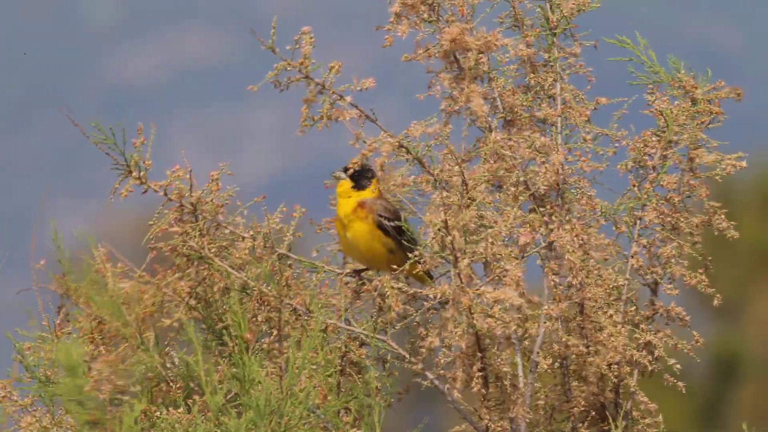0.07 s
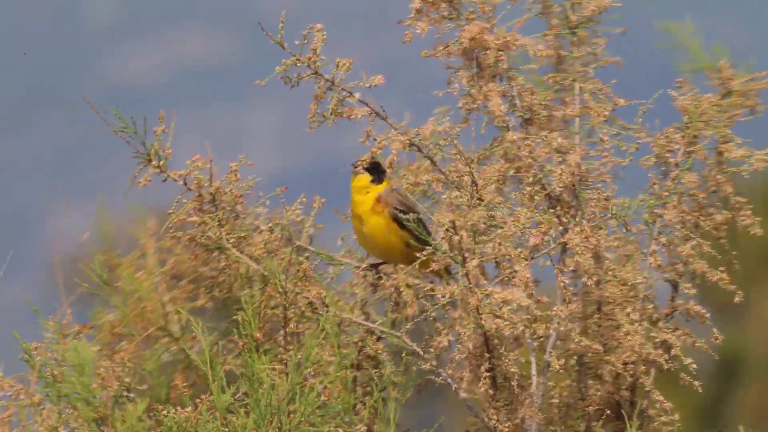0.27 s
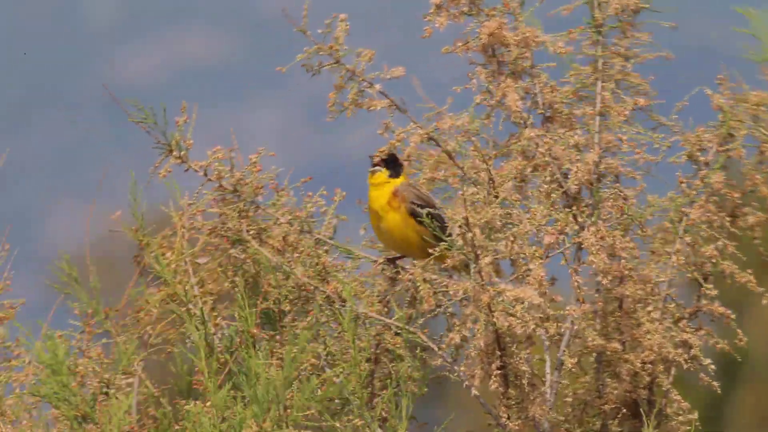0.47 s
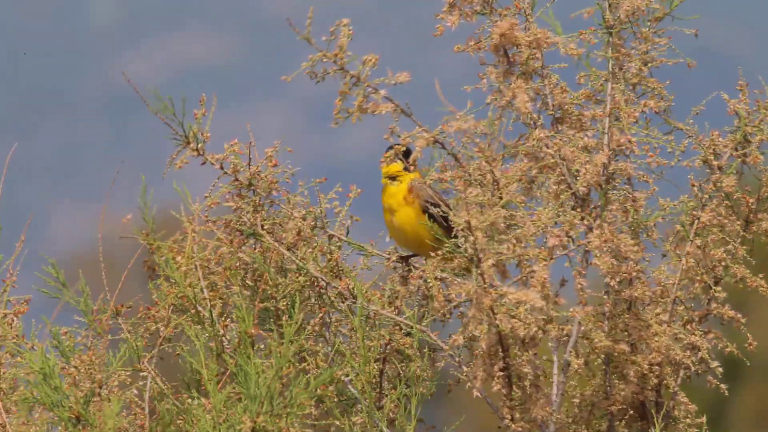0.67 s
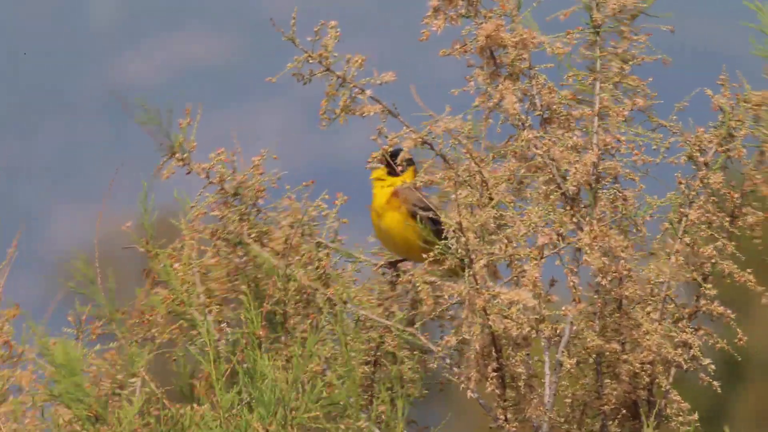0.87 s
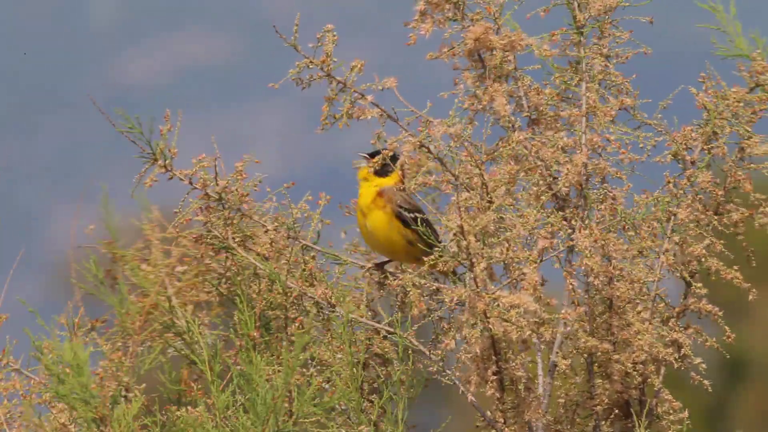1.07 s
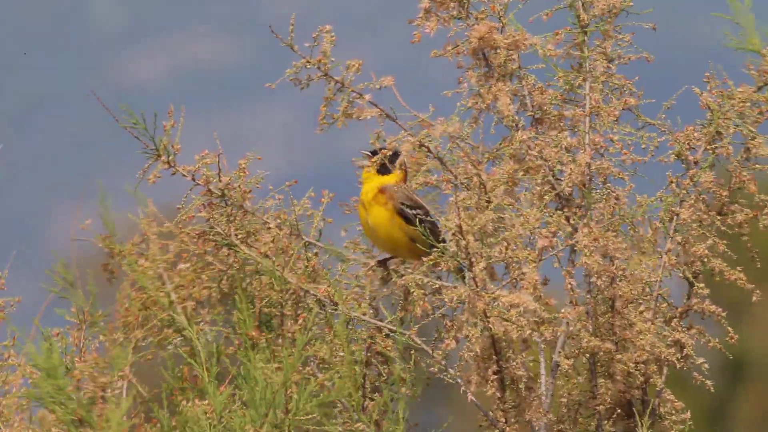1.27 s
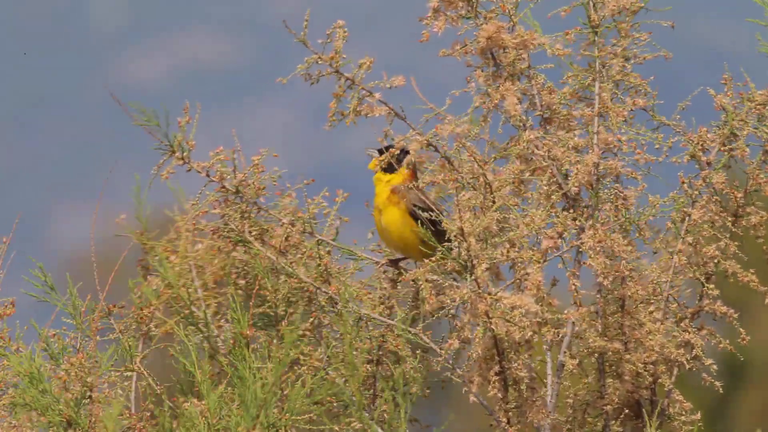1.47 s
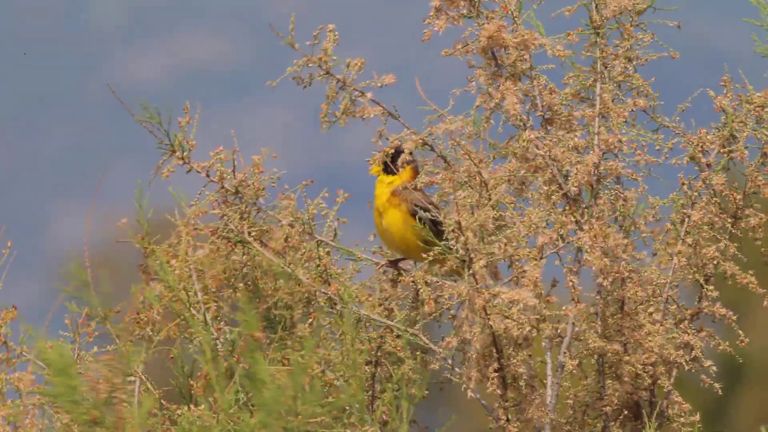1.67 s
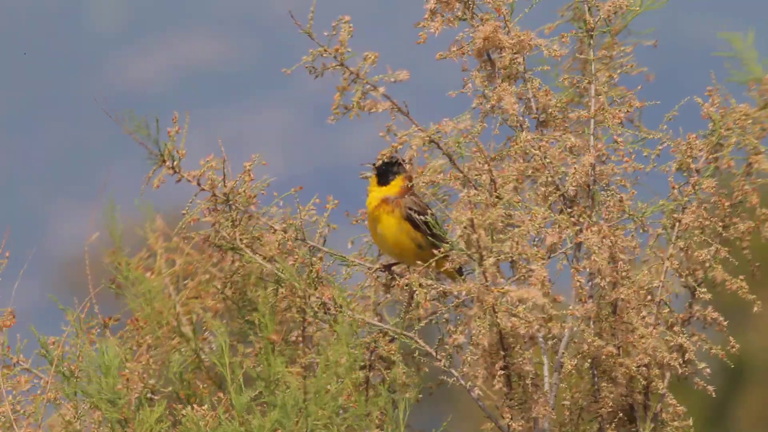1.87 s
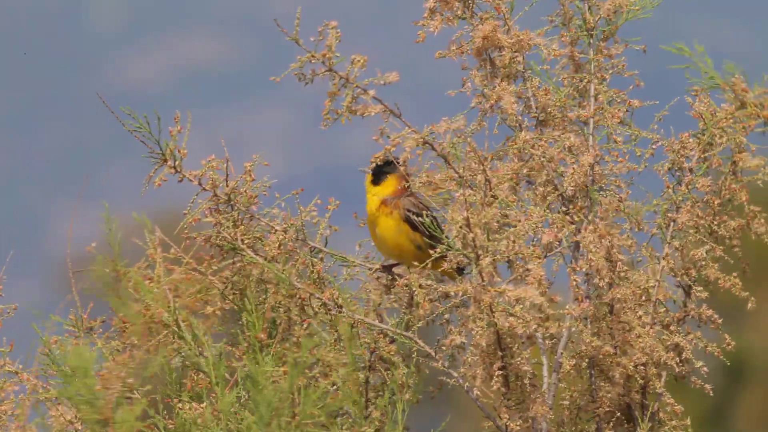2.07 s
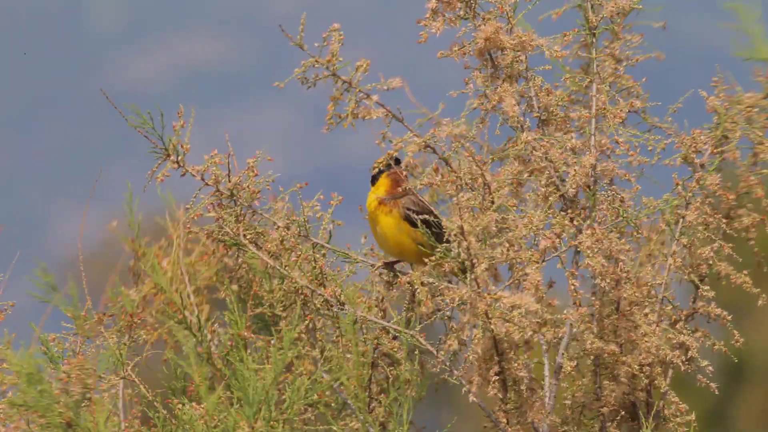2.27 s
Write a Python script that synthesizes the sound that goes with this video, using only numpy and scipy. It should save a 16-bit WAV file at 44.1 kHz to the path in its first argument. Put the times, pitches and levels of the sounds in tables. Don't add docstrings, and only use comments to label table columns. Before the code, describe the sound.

Songbird song from a bush: two short buzz-whistles, then quick chattering high notes, over faint breeze

```python
import sys
import numpy as np
from scipy import signal
from scipy.fft import rfft, irfft
from scipy.io import wavfile
from scipy.ndimage import uniform_filter1d

SR = 44100
rng = np.random.default_rng(int(sys.argv[2]) if len(sys.argv) > 2 else 0)


def volts(x):
    e = np.asarray(x, float) / 20
    return 10 ** e


def inscribe(sig):
    pcm = np.round(np.clip(np.atleast_2d(sig).T, -1, 1) * 32767)
    wavfile.write(sys.argv[1], SR, pcm.astype(np.int16))


N = 103635

# (frequency [Hz], spectrum level [dB])
AIR_SPECTRUM = [(25, -9), (190, -2), (330, -15), (1300, -19), (3500, -13), (15600, -33)]
# (time [s], pitch [Hz], level [dB])
WIND_THUMPS = [(.036, 105, -35), (.080, 150, -39), (.171, 160, -28), (.905, 55, -42), (1.345, 55, -40),
               (1.13, 80, -40), (1.42, 85, -34), (.26, 70, -46), (.285, 140, -46), (.325, 110, -46),
               (.59, 70, -48), (.675, 90, -47), (1.10, 170, -44), (1.25, 60, -46), (1.425, 200, -42),
               (1.46, 50, -43), (1.50, 100, -47), (1.63, 80, -48)]
# (time [s], level [dB])
RUSTLE_LEVEL = [(0, -56), (.08, -57), (.2, -51), (.3, -66), (.75, -72), (.8, -59), (1.0, -61), (1.1, -68),
                (2.05, -69), (2.15, -60), (2.35, -64)]
# (centre [Hz], width [Hz], level [dB])
STALK_MODES = [(300, 140, -9), (850, 300, -17), (1700, 600, -6), (3000, 500, -5), (4100, 900, -7)]
# (time [s], centre [Hz], level [dB], decay [s])
TWIG_SNAP = [
    (1.336, 700, -40, .002),
    (1.342, 8000, -42, .006),
    (1.348, 2200, -46, .005),
]

SWEEP = .0098, [2680, 2880, 3400, 4250, 6000, 4700, 3500, 2950, 2700], [-14, -10, -5, -1, -16, 2, -6, -11,
         -15]
WHISTLE = .043, [2850, 3330, 3470, 3500, 3500, 3490, 3480, 3460, 3440], [-14, -6, -2, 0, -2, -4, -3, -6,
           -22]
PULSE = .0122, [3080, 2960, 2920, 2920, 2900, 2780], [-9, 0, 0, -1, -1, -2, -10]
LEAD_IN = .018, [2900, 2900, 2900, 2800], [-24, -14, -5, 0, -3]
HIGH_LEAD = .029, [4050, 4150, 4200, 4250, 4280, 4250, 3500], [-20, -15, -14, -12, -4, -2, 0, -4, -2]
DIP_PULSE = .0134, [4100, 3500, 3100, 3250, 3380, 3300, 3180, 3020], [-14, -2, -7, 0, -1, 0, -4, -12]
CHUCK = .030, [2550, 2340, 2310, 2320, 2320], [0, -4, -4, -5, -15, -10, -12, -18]
SLIDE = .012, [4300, 4000, 3750, 3500, 3430, 3200], [-16, -10, -4, -2, -3, 0, -8]
FLICK = .0052, [4300, 3750, 3450, 3180, 3000], [-11, -2, 0, -6, -11]
CLOSE = .0135, [3400, 4100, 4050, 4150, 4300, 4300, 4050], [-12, -3, -6, -4, -9, -2, -1, 0, -6]
TICK = .0034, [5100, 4750, 4450, 4000, 3500], [-14, -1, 0, -8, -11, -16]
ARCH = .103, [2050, 2080, 2100, 2170, 2330, 2720, 2740, 2640, 2150], [-30, -23, -18, -15, -10, 0, -4, -5,
        -20]
LOW = .017, [2000, 1840, 1820], [1, 0, -8]
RISE = .034, [2650, 2720, 2900, 3120], [-22, -12, -6, 0, -8]
TRILL_DOWN = .0066, [3300, 3050, 2820, 2680, 2580], [-12, -3, -1, 0, -13]
TRILL_UP = .0048, [2480, 2700, 3000, 3250], [-15, -11, -7, 0, -8]
TRILL_HOLD = .0135, [2950, 3020, 3050, 3100, 3100], [-4, 0, -2, -3, -3, -6, -13]
FALL = .034, [2450, 2700, 2480, 2400, 2330, 2220, 2100], [-16, 0, -5, -9, -10, -14, -12, -16, -22]
HOOK = .009, [4400, 5100, 5500, 5350, 4950, 4900, 4900], [-10, 0, -16, -1, -1, -4, -14]
HOOK_END = .010, [5400, 5400, 5000], [-8, 0, -3, -2]
UP = .032, [2900, 3050, 3150, 3250, 3550, 3750, 3850, 4100], [-14, -11, -9, -8, 0, -1, -2, -1, -10]
DOWN = .014, [4700, 3650, 3350, 3280, 3180, 2950], [-14, 0, -3, 0, 0, -4, -14]
UP_LOW = .028, [2300, 2500, 2680, 2870, 3050, 3250, 3650], [-18, -12, -10, -4, 0, -2, -1, 0, -14]
DOWN_LOW = .023, [3900, 3050, 2880, 2800, 2700, 2500, 2200, 2400], [-12, 0, -4, -3, -6, -16, -20, -24]
FAR_WHISTLE = .175, [1550, 1870, 1730, 1600, 1640, 1690, 1715, 1550], [-8, -4, -7, -3, 0, -12]
FAR_RISE = .12, [3650, 4030, 4150, 4400, 4600], [-4, 0, -10]
FAR_LOW = .085, [1000, 1050, 1120, 1200], [-6, 0, -2, -6]
FAR_CHIP = .016, [1400, 1750, 1800], [-6, 0, -3]
FAR_PEEP = .02, [5600, 5750], [0, -4]

# (gesture, time [s], level [dB], pitch factor [1] if given)
FAR_CALLS = [(FAR_WHISTLE, 1.108, -47), (FAR_WHISTLE, 2.12, -52), (FAR_RISE, 2.24, -51),
             (FAR_RISE, 1.50, -55), (FAR_LOW, 2.07, -59), (FAR_PEEP, .912, -50),
             (FAR_PEEP, 1.43, -53, 1.04), (FAR_CHIP, 2.108, -50), (FAR_CHIP, 1.580, -53)]
# (time [s], level [dB])
FAR_CHURRS = [(.80, -52), (1.17, -52), (1.56, -50), (1.72, -52), (1.855, -50), (2.09, -50), (2.225, -50),
              (2.315, -50)]
OVERTONES = -36, -42
# (gesture, time [s], level [dB], pitch factor [1] and overtones [dB] if given)
SINGLE_NOTES = [(WHISTLE, .267, -17.5, 1., (-33, -38)), (WHISTLE, .540, -17, 1., (-33, -38)),
                (TICK, .8848, -34, 1.1), (LEAD_IN, .669, -25), (HIGH_LEAD, .854, -22, 1., (-28, -36)),
                (CHUCK, 1.035, -30), (CHUCK, 1.0745, -30), (FLICK, 1.0985, -33, 1.05), (SLIDE, 1.1015, -20),
                (LOW, 1.165, -39, 1.25), (CHUCK, 1.1735, -29, .97), (CHUCK, 1.213, -29, .96),
                (FLICK, 1.237, -30), (SLIDE, 1.2405, -19), (CLOSE, 1.4065, -18, 1., (-24, -28)),
                (LOW, 1.533, -38), (LOW, 1.592, -39), (FALL, 1.822, -21), (HOOK_END, 1.978, -22),
                (DOWN, 2.032, -24), (TRILL_DOWN, 2.046, -25, 1.08), (UP_LOW, 2.054, -25),
                (DOWN_LOW, 2.0825, -24)]
# (gesture, overtones [dB], (time [s], level [dB], flutter [Hz], flutter length [s], depth [0-1]))
FLUTTERED_SLURS = [
    (ARCH, (-43, -52, -48), (1.429, -20.5, 250, .054, .25)),
    (RISE, (-46, -50), (1.638, -19, 270, .020, .8)),
    (UP, (-46, -50), (2.000, -25, 270, .020, .9)),
]
# (gesture, overtones [dB], first time [s], period [s], level of each repeat [dB])
TRAINS = [(SWEEP, (-23, -31), .1852, .0117, [-36, -29, -24, -21, -19, -19, -19]), (SWEEP, (-23, -31),
          .4535, .0122, [-35, -30, -26, -22, -20, -20, -20]), (PULSE, (-45, -48),
          .6885, .0134, [-21, -21, -19, -19, -19, -24]), (DIP_PULSE, (-43, -35),
          .8850, .0143, [-25, -21, -20, -19, -19, -18]), (FLICK, (-37, -36),
          1.115, .0062, [-18, -19, -20, -19, -23, -26]), (FLICK, (-37, -36),
          1.2535, .0062, [-20, -17, -18, -18, -20, -25]), (TICK, (-20, -32),
          1.3436, .0063, [-24, -23, -23, -23, -22, -21, -21, -18, -18, -21]), (HOOK, (-36, -40),
          1.919, .0115, [-42, -33, -28, -25, -22]), (TRILL_DOWN, (-39, -50),
          1.6752, .0278, [-20, -21, -23, -19, -21, -23]), (TRILL_UP, (-40, -48),
          1.6828, .0277, [-21, -19, -19, -21, -20]), (TRILL_HOLD, (-46, -48),
          1.6868, .0277, [-21, -21, -23, -22, -22])]


def unit(x):
    return x / np.sqrt(np.mean(x ** 2))


def band(x, hz, width_hz):
    low = max(hz - width_hz / 2, hz / 6)
    high = min(low + width_hz, .45 * SR)
    return signal.sosfilt(signal.butter(2, [low, high], "band", fs=SR, output="sos"), x)


def walk(rate_hz):
    k = int(SR / rate_hz)
    smooth = uniform_filter1d(rng.standard_normal(N), k)
    return unit(uniform_filter1d(smooth, k))


def wind(t):
    f = np.fft.rfftfreq(N, 1 / SR) + 1
    hz, level_db = np.array(AIR_SPECTRUM).T
    colour = volts(np.interp(np.log(f), np.log(hz), level_db))
    hiss = unit(irfft(rfft(rng.standard_normal(N)) * colour, N))
    bass = signal.sosfiltfilt(signal.butter(2, 130, fs=SR, output="sos"), hiss)
    gusty_bass = bass * volts(-4 + 4.5 * walk(9))
    flickering_hiss = (hiss - bass) * volts(1.3 * walk(8))
    out = volts(-54) * (gusty_bass + flickering_hiss)
    for at, hz, db in WIND_THUMPS:
        swell = np.exp(-((t - at) * hz / .8) ** 2)
        out += volts(db) * swell * np.sin(2 * np.pi * hz * (t - at) + 6 * rng.random())
    return out


def stalks(t):
    grains = rng.standard_normal(N) * volts(3.0 * walk(400))
    scrape = unit(band(grains, 2800, 5000))
    hollow = sum(volts(db) * unit(band(grains, hz, width)) for hz, width, db in STALK_MODES)
    out = (scrape + hollow) * volts(np.interp(t, *np.array(RUSTLE_LEVEL).T))
    for at, hz, db, decay_s in TWIG_SNAP:
        burst = unit(band(rng.standard_normal(N), hz, 1.6 * hz))
        out += volts(db) * burst * (t > at) * np.exp(-np.abs(t - at) / decay_s)
    return out


def syrinx(out, shape, at, db, pitch=1., over_db=OVERTONES, flutter=None):
    edge_s, rasp_db, beak_db_per_khz = .0015, 5, -5
    length, hz, rel_db = shape
    t = np.arange(0, length, 1 / SR)

    def path(points):
        return uniform_filter1d(np.interp(t, np.linspace(0, length, len(points)), points), size=25)

    phase = 2 * np.pi * (np.cumsum(path(hz)) * pitch / SR + rng.random())
    to_edge = np.minimum(t, length - t) / min(edge_s, length / 4)
    env = volts(db + path(rel_db)) * np.sin(np.pi / 2 * np.clip(to_edge, 0, 1)) ** 2
    if flutter:
        flutter_hz, lasts_s, depth = flutter
        dip = np.clip((lasts_s - t) / .006, 0, min(depth, 1))
        env = env * (1 - dip * np.cos(np.pi * flutter_hz * t) ** 2)
    overtones = sum(volts(o) * np.sin((k + 2) * phase) for k, o in enumerate(over_db))
    rasp = volts(rasp_db * 5 * uniform_filter1d(rng.standard_normal(len(t)), size=25))
    beak = volts(beak_db_per_khz * (path(hz) / 1000 - 3))
    y = np.sqrt(2) * env * (np.sin(phase) + beak * overtones * rasp)
    i = int(at * SR)
    out[i:i + len(y)] += y[:N - i]


def far_birds(t):
    out = np.zeros(N)
    for call in FAR_CALLS:
        syrinx(out, *call, over_db=())
    out = out * volts(2.5 * walk(90))
    throb = 1 + .7 * np.sin(2 * np.pi * 150 * t)
    churr_s = .065
    for at, db in FAR_CHURRS:
        swell = np.sin(np.pi * np.clip((t - at) / churr_s, 0, 1))
        out += volts(db) * swell * throb * unit(band(rng.standard_normal(N), 3700, 1500))
    return out


def tail(db, t60_s, gap_s):
    t = np.arange(int(.7 * SR)) / SR
    h = rng.standard_normal(len(t)) * volts(-60 * t / t60_s) * (t > gap_s)
    return volts(db) * h / np.sqrt(np.sum(h ** 2))


def bunting():
    out = np.zeros(N)
    for shape, over_db, first, period, levels in TRAINS:
        for k, db in enumerate(levels):
            pitch = 1 + .006 * rng.standard_normal()
            syrinx(out, shape, first + k * period, db, pitch, over_db)
    for note in SINGLE_NOTES:
        syrinx(out, *note)
    for shape, over_db, (at, db, *flutter) in FLUTTERED_SLURS:
        syrinx(out, shape, at, db, 1., over_db, flutter)
    out = out * volts(.5 * walk(300))
    leaves = band(tail(-7, .045, .002), 4900, 3200) + band(tail(-6, .06, .002), 9500, 6000)
    twigs = tail(-13, .10, .002)
    slope = tail(-24, .5, .01)
    return out + signal.fftconvolve(out, leaves + twigs + slope)[:N]


def scene():
    t = np.arange(N) / SR
    return (wind(t) + stalks(t) + far_birds(t) + bunting())[None]


def band_limit(x):
    return signal.sosfilt(signal.butter(12, 15740, fs=SR, output="sos"), x)


def record(dry):
    x = signal.sosfilt(signal.ellip(8, .2, 70, 15600, fs=SR, output="sos"), dry)
    return band_limit(x)


dry = scene()
out = record(dry)
inscribe(out)
```